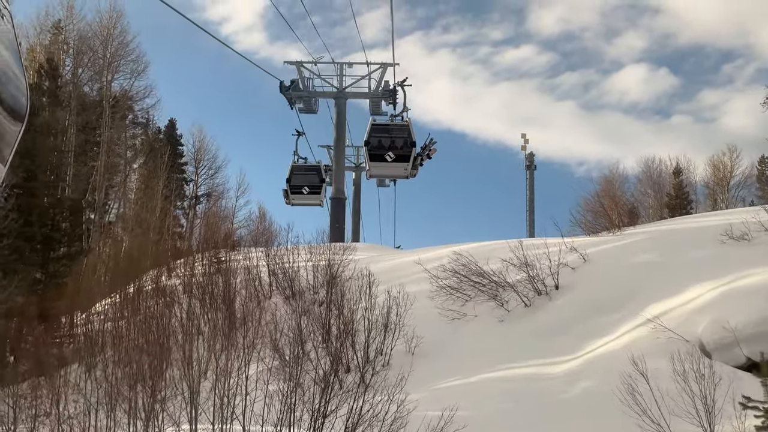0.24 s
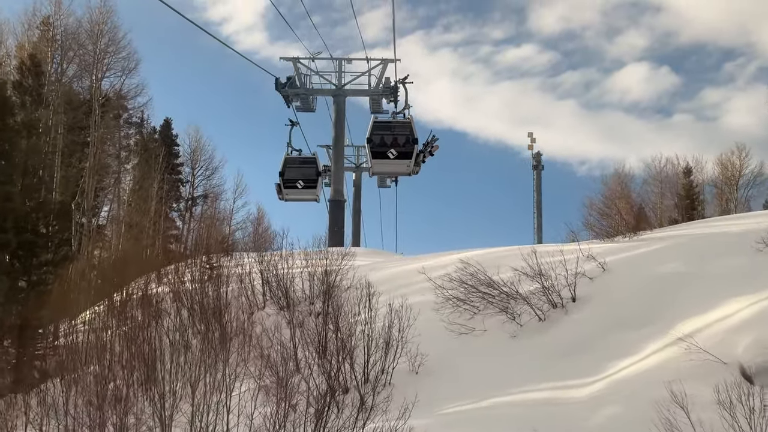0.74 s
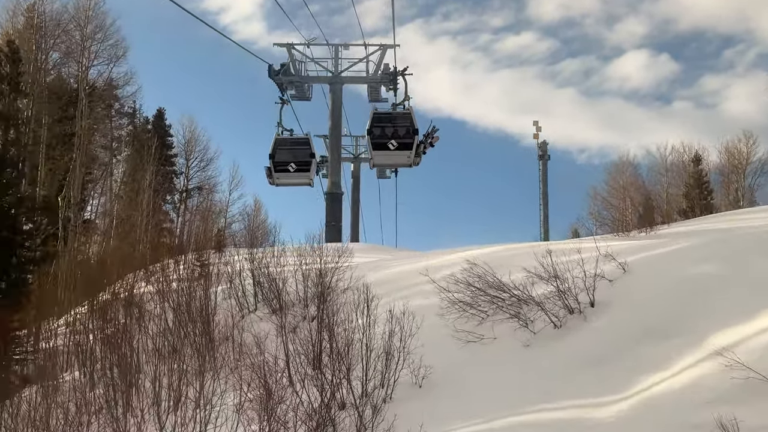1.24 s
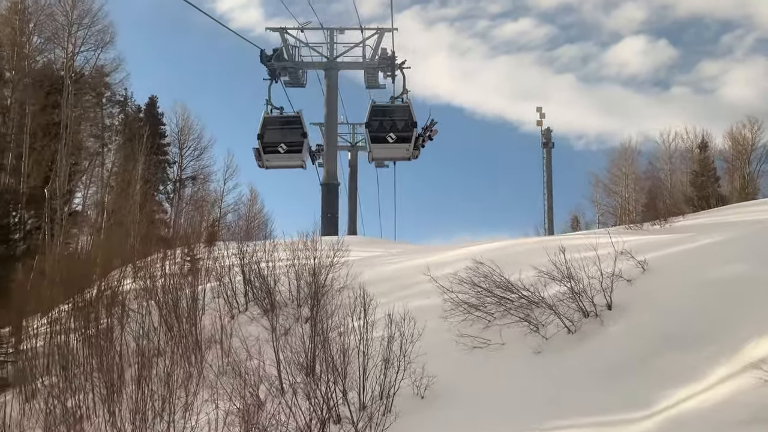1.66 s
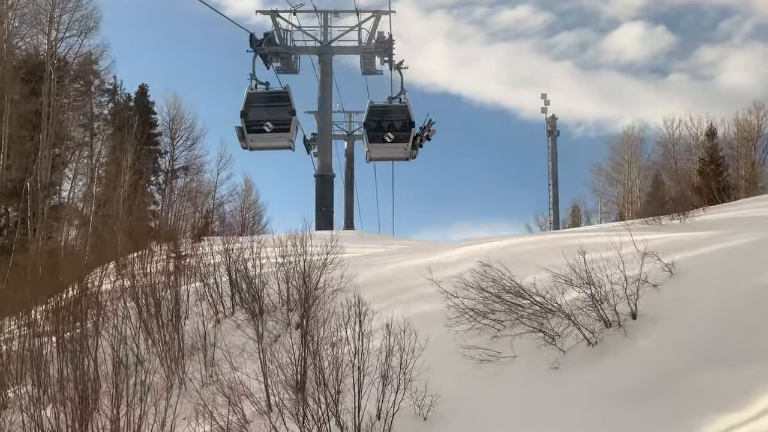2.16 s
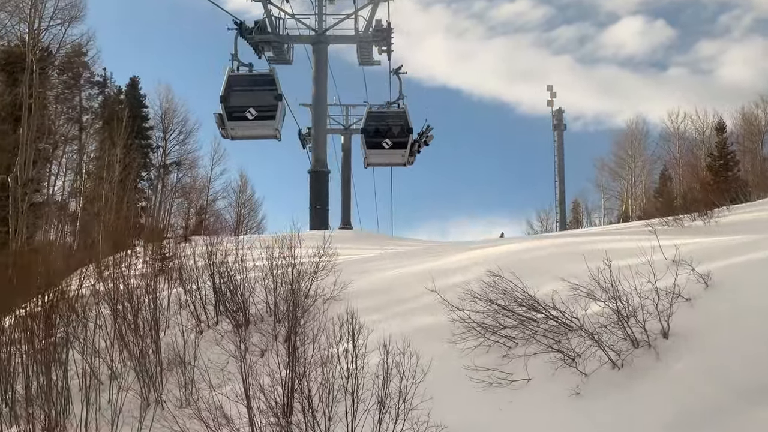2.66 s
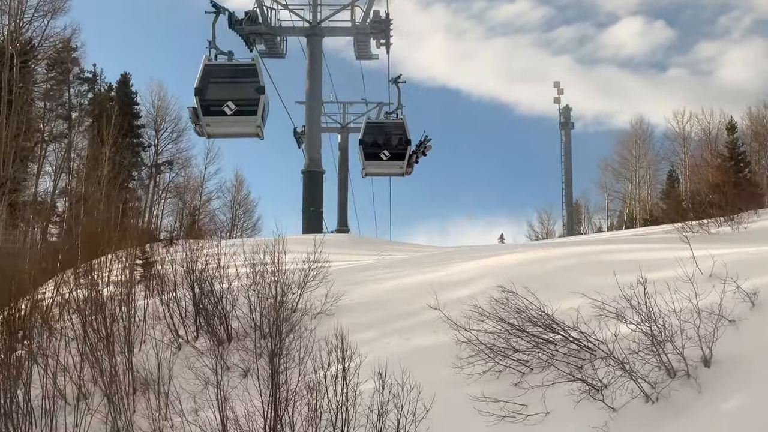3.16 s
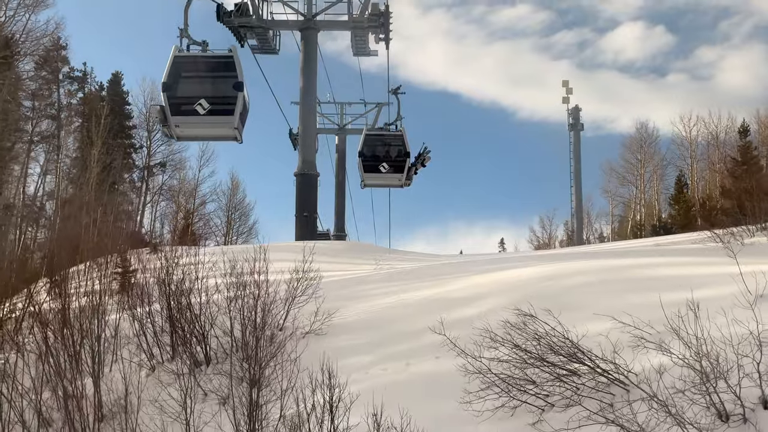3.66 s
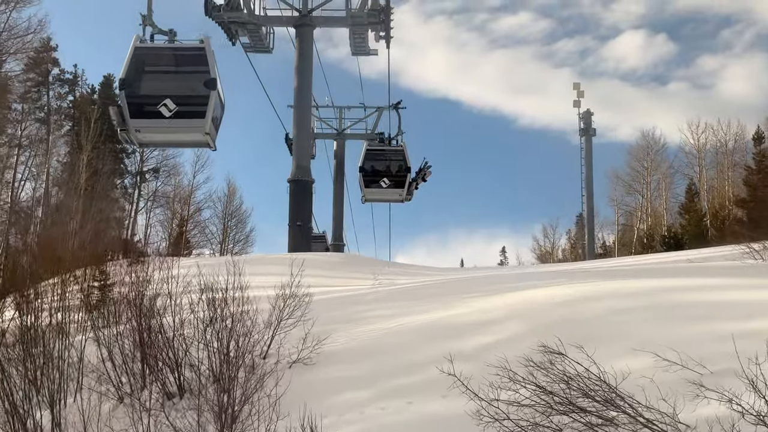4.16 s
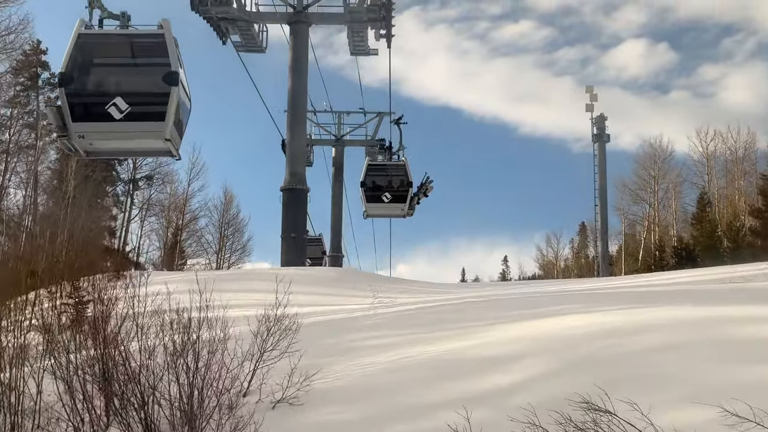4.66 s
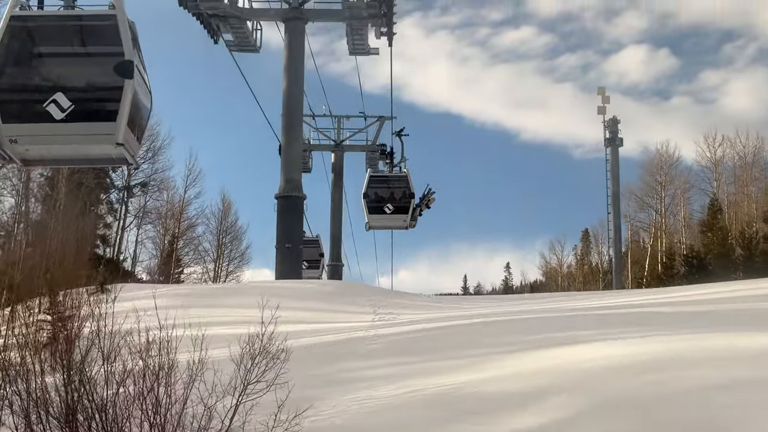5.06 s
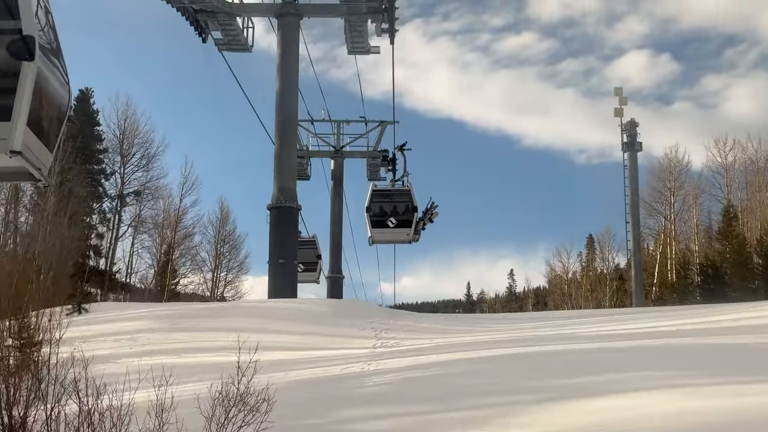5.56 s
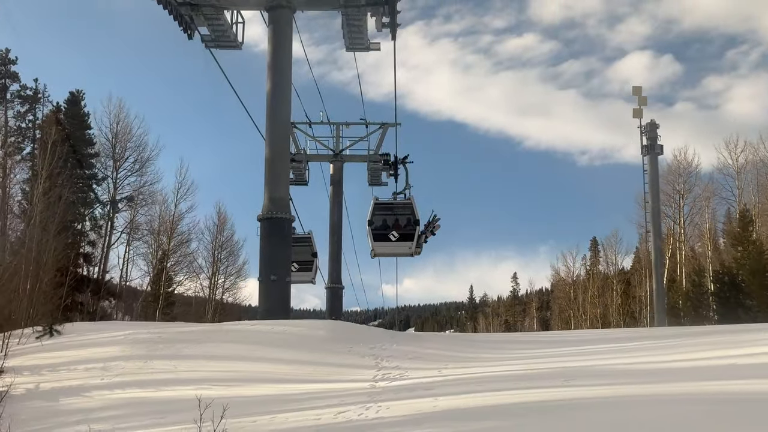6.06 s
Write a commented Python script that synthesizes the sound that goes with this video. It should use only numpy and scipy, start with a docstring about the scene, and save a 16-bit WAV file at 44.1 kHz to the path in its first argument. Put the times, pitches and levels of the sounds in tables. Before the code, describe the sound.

A small microphone rides close to skis on packed snow, with no echo. Faint edge scrapes and cracking crust crumbs punctuate a wavering low lift hum, slightly left, which grows fuller as a tower nears. Midway a burst of crunches carries a rising and falling buzz; later one ski slaps, edges groan and grind, and powder sprays briefly.

```python
"""First the hum of a gondola lift's haul rope on the sheaves, gaining overall as the tower nears.
The rope is a wavering sine with weak overtones; the tower adds a drone, beating tones and filtered rumble.
Close by, skis on packed snow hiss, scrape and crunch: random grains and noise, shaped by each edge stroke.
Crumbs crack, an edge squeaks, groomed ridges buzz once, a ski clacks once, powder sprays and air thumps.
A small two-port microphone travels with the skis over open, echoless snow."""
import sys
import numpy as np
from scipy import signal
from scipy.fft import rfft, irfft, next_fast_len
from scipy.io import wavfile
from scipy.ndimage import uniform_filter1d, map_coordinates

SR = 44100
rng = np.random.default_rng(int(sys.argv[2]) if len(sys.argv) > 2 else 0)


def log_audio(samples):
    """Write samples as a 16-bit WAV file to the path given in sys.argv[1]."""
    # one column per channel
    frames = np.atleast_2d(samples).T
    # limit to full scale, then quantise
    limited = np.clip(frames, -1, 1)
    pcm = np.round(limited * 32767).astype(np.int16)
    wavfile.write(sys.argv[1], SR, pcm)


N = 278271  # samples

# Every spectrum below is relative: the sound it colours is brought to rms 1 before its level is set.

# Rope strands drumming on the sheaves: [t/s, level before trim/dB]
ROPE_LEVEL = [(0.0, -41), (0.12, -35), (0.26, -47.5), (0.77, -39.5), (1.02, -59), (1.09, -41),
              (1.79, -32.5), (3.51, -32.5), (3.6, -27.5), (3.85, -34), (4.06, -25), (4.24, -34.5),
              (5.34, -27), (6.12, -30), (6.24, -24.5), (6.31, -27)]
# Rate at which the strands pass the sheaves: [t/s, f/Hz]
ROPE_PITCH_CURVE = [(0, 82.46), (.9, 82.37), (1.3, 85.4), (5.6, 85.27), (5.85, 84.57)]

# The mast's low drone: [t/s, level before beating/dB]
DRONE_LEVEL = [(0, -53), (1.1, -36.5), (1.7, -37.5), (3.35, -33.5), (3.75, -39), (4.2, -37), (6.31, -44)]
# Pitch of that drone: [t/s, f/Hz]
DRONE_PITCH_CURVE = [(0, 41), (1.1, 39), (3.4, 40), (3.9, 42.4)]
# The drone swells and sinks: rate/Hz, depth/dB either way, t/s of one crest
BEAT_HZ, BEAT_DB, BEAT_CREST_S = 2.39, 2.5, 1.69
# The sheave train shaking the tower: [t/s, level before trim/dB]
SHAKE_LEVEL = [(0, -47.5), (1.9, -45), (6.31, -43)]
# Narrow tones of the sheave train: [f/Hz, level relative to the shaking, before nearness and trim/dB]
SHEAVE_TONES = [(27.3, -15), (71, 4), (75.3, -2), (112, -12.5), (138, -13), (366, -21)]
# Those tones come forward as the tower nears, then ease back: [t/s, level change before trim/dB]
TONE_NEARNESS = [(0, -20), (.9, -8.5), (1.5, 3), (2.5, 2), (6.3, -6.5)]
# Tower rumble: [f/Hz, level per Hz/dB]
RUMBLE_SPECTRUM = [(14, -47), (25, -8), (35, -1), (65, 3.5), (115, -2.5), (150, -5), (200, -12.5),
                   (360, -19.5), (600, -29), (1500, -44), (4000, -76)]

# Strokes of a ski edge: [start t/s, length/s, then before trim: edge scrape/dB, base hiss/dB, crunch/dB]
EDGE_STROKES = [(0.0, 0.14, -56, -63.5, -56), (0.128, 0.16, -59.5, -67, -58), (0.43, 0.13, -66, -67, -65),
                (0.538, 0.27, -60.5, -65, -62), (0.81, 0.44, -64.5, -64.5, -68), (1.12, .07, -65, -67, -59),
                (1.211, .12, -56.5, -60, -56), (1.651, 0.084, -66.5, -67, -67),
                (1.792, 0.17, -65, -65.5, -68), (1.94, 0.17, -60.5, -62.5, -58.5),
                (2.086, 0.27, -65, -65.5, -67), (2.428, 0.094, -68, -70, -47.5),
                (2.488, 0.075, -51.5, -67, -42.5), (2.566, .12, -52.5, -60, -54),
                (2.655, 0.093, -51.5, -58.5, -43.5), (2.981, 0.13, -65, -62.5, -58),
                (3.32, .2, -68.5, -65, -59.5), (3.497, 0.14, -60, -61.5, -64),
                (3.639, 0.373, -57.5, -60.5, -52), (3.999, 0.082, -61.5, -53.5, -54.5),
                (4.085, 0.21, -59.5, -60, -56), (4.227, 0.19, -57.5, -57.5, -55.5),
                (4.427, 0.24, -62, -60, -58), (4.699, .14, -65.5, -67.5, -55.5),
                (5.057, 0.029, -57.5, -58.5, -55), (5.331, 0.11, -52, -57.5, -46),
                (5.412, 0.17, -50.5, -55.5, -49), (5.568, 0.21, -54.5, -57.5, -53.5),
                (5.789, .16, -60.5, -62, -59), (5.944, 0.17, -50, -54, -49),
                (6.261, .06, -53.5, -57.5, -50)]
# The edge digs in, lets go, and eases while it holds
ATTACK_S, RELEASE_S, SAG_DB_PER_S = 0.045, 0.049, 2
# Hiss of the skis running flat under the strokes: [t/s, level before trim/dB]
GLIDE_LEVEL = [(0, -73), (1.6, -69), (3.3, -66.5), (4.9, -70), (5.25, -65.5), (6.31, -64.5)]
GLIDE_SCRAPE_DB, GLIDE_CRUNCH_DB = 0.5, 1.5  # relative to the glide hiss, before trim
# Bases on fine crystals: [f/Hz, level per Hz/dB]
HISS_SPECTRUM = [(900, -21), (2500, -1), (3600, -4), (4600, -5), (5100, 0), (7000, 0.5), (8000, -0.5),
                 (9000, 2), (10000, -2), (11200, -10), (13000, -12), (14000, -7.5), (15800, -9)]
# Edges on coarser grains: [f/Hz, level per Hz/dB]
SCRAPE_SPECTRUM = [(400, -5.5), (900, -1.5), (1300, 4), (1600, 0), (2200, 0), (3000, -9.5), (4300, -12.5),
                   (6000, -17), (12000, -36)]
# Snow packing under the edges: [f/Hz, level per Hz/dB]
CRUNCH_SPECTRUM = [(130, -30), (300, 1.5), (500, 3), (850, 1), (1200, -9), (1600, -16.5), (3000, -35)]
# An edge ploughs deep and groans: [start t/s, length/s, level/dB]
DEEP_PLOUGHS = [(1.275, 0.073, -47), (5.301, .13, -37.5), (5.472, .32, -44), (5.984, 0.097, -44)]
# Colour of that groan: [f/Hz, level per Hz/dB]
PLOUGH_SPECTRUM = [(100, -12), (190, 7), (260, 1), (360, 4), (480, -11), (800, -36)]

# Largest crumbs of crust cracking under the skis: [t/s, level/dB, treble relative to it/dB]
LARGE_CRUMBS = [(0.569, -41, -20), (0.601, -43, -21), (0.786, -35.5, -27), (2.76, -33.5, -27),
                (2.813, -37.5, -21), (3.013, -44, -21), (3.675, -42.5, -5), (3.345, -53, -1),
                (3.967, -38, -16), (4.195, -39, -22), (4.637, -42, -13), (4.817, -46, -6), (5.093, -47, -3),
                (5.285, -44, -21), (5.832, -37.5, -24), (5.971, -34, -21), (6.047, -34, -17),
                (6.137, -36, -21)]
# Body of a crack: [f/Hz, level per Hz/dB]
CRACK_SPECTRUM = [(200, 2), (600, 11.5), (1100, 4.5), (2400, -1), (3300, -16.5), (8000, -31)]
# Small crumbs: rate, mean level over the scrape gain, scatter, treble relative to the crumb
SMALL_CRUMBS_PER_S, SMALL_CRUMB_DB, SMALL_SPREAD_DB, SMALL_TREBLE_DB = 20, 4, 2, -14

# A ski crossing groomed ridges: [t/s, ridge rate f/Hz]
RIDGE_RATE = [(2.49, 330), (2.538, 440), (2.562, 412), (2.592, 550), (2.615, 672), (2.633, 700),
              (2.657, 655), (2.675, 560), (2.715, 470)]
# The octave swells first, then the fundamental: [multiple of rate, middle t/s, half length/s, level/dB]
RIDGE_BUZZ = [(1, 2.655, .052, -37.5), (2, 2.608, .066, -36.5)]
RASP_DB = -49  # grains shed at each ridge

# One clack, a ski slapping down and rebounding: [t/s, level/dB]
SKI_SLAPS = [(5.0058, -25), (5.0162, -32), (5.028, -38)]
# Bending modes of the ski: [f/Hz, mean level relative to the slap/dB, t60/s]
BENDING_MODES = [(366, -4, 0.077), (436, -16, 0.16), (573, -19, .08), (830.4, -11.5, 0.08),
                 (1010, -24, .04)]

# Thin squeaks of cold snow under an edge: [middle t/s, f/Hz, half length/s, level/dB]
EDGE_SQUEAKS = [(1.679, 10750, .05, -72), (3.58, 4990, 0.079, -63), (3.701, 7680, .045, -56.5),
                (3.714, 14200, .06, -60), (4.381, 2390, 0.014, -53)]
# Powder thrown off the tail of a ski: [f/Hz, level per Hz/dB]
POWDER_SPECTRUM = [(1000, -27), (2200, 1), (4200, -1.5), (6000, -1.5), (8000, -22), (15000, -28)]
# Air pushing on the microphone: [f/Hz, level per Hz/dB]
BUFFET_SPECTRUM = [(18, -35), (32, 0.5), (52, 0), (75, -17), (130, -45), (400, -90)]

# Likeness of the two microphone ports: [f/Hz, correlation before the port phases]
PORT_LIKENESS = [(45, 1), (150, .9), (300, .65), (1200, .68), (2000, 1), (2300, 1), (2900, .93),
                 (4800, .95), (5500, 1), (8600, 1), (10000, .9), (11200, 1), (13000, 1), (14000, .8)]
# Phase by which the left channel leads the right: [f/Hz, lead/rad]
CHANNEL_LEAD = [(40, 0), (90, .45), (200, .05), (350, 0), (520, 1.5), (720, 1.6), (1400, -.15), (2200, 0),
                (2800, .42), (4600, .35), (5300, 0), (6700, .1), (7400, 1.3), (8000, 3.1), (8550, 3.1),
                (9300, 1.3), (10200, .9), (11000, 0), (13000, 0), (15700, -2.2)]
TOP_HZ = 15780  # the microphone's band limit


def rope():
    """The twisted strands drum on the sheaves: a nearly pure hum with weak, wavering overtones."""
    hz, = curves(ROPE_PITCH_CURVE)
    level_db, = curves(ROPE_LEVEL)
    phase = turns(hz + 0.392 * wobble(9))
    second_gain = amp(-24 + 5.6 * wobble(6.9))
    second = second_gain * np.sin(2 * phase + 0.41 * wobble(10))
    third_gain = amp(-31.0 + 4.56 * wobble(7))
    third = third_gain * np.sin(3 * phase + wobble(12))
    hum = np.sin(phase) + second + third
    return panned(amp(level_db + 2.5) * hum, left_db=4.5)


def tower():
    """The mast drones about an octave under the rope; the shaken sheave train adds beating tones and rumble."""
    hz, = curves(DRONE_PITCH_CURVE)
    drone_db, = curves(DRONE_LEVEL)
    shake_db, = curves(SHAKE_LEVEL)
    nearness_db, = curves(TONE_NEARNESS)
    beat_db = BEAT_DB * np.cos(2 * np.pi * BEAT_HZ * (np.arange(N) / SR - BEAT_CREST_S))
    drone = amp(drone_db + beat_db) * np.sin(turns(hz + 0.96 * wobble(7.42)))
    tones = 0
    for tone_hz, db in SHEAVE_TONES:
        tone_gain = amp(db + 3.6 * wobble(4.19))
        tones = tones + tone_gain * np.sin(turns(tone_hz + 1.068 * wobble(4.99)))
    rumble = amp(6.0) * coloured(noise(), RUMBLE_SPECTRUM)
    train = panned(amp(1.5 + nearness_db) * tones + rumble, left_db=0.5)
    return drone + amp(shake_db) * train


def skis(scrape_gain, hiss_gain, crunch_gain):
    """The bases hiss on fine crystals; the edges break coarser grains, in clumps, and pack the snow below."""
    clumps, unevenness = wobble(90), wobble(18)
    crystals = coloured(grains(rate=5300, spread_db=2.5, smooth=1.75), HISS_SPECTRUM)
    chips = speckled(grains(rate=900, spread_db=3.0, smooth=1.0), depth_db=2.5)
    lumps = speckled(grains(rate=250, spread_db=3, smooth=1.0), depth_db=2.0)
    hiss = hiss_gain * amp(5.5 + 0.5 * clumps + 0.44 * unevenness) * crystals
    scrape = scrape_gain * amp(2.5 + 0.99 * clumps + 0.54 * unevenness) * coloured(chips, SCRAPE_SPECTRUM)
    crunch = crunch_gain * amp(3.0 + 0.43 * clumps + 2.3 * unevenness) * coloured(lumps, CRUNCH_SPECTRUM)
    plough_gain = sum(amp(db) * bite(start, length) for start, length, db in DEEP_PLOUGHS)
    groan = coloured(grains(rate=240, spread_db=3.5, smooth=0.35), PLOUGH_SPECTRUM)
    return hiss + scrape + crunch + plough_gain * groan


def friction():
    """Gains of scrape, hiss and crunch: the strokes add in power to the flat glide."""
    glide_db, = curves(GLIDE_LEVEL)
    offsets_db = np.array([[GLIDE_SCRAPE_DB], [0], [GLIDE_CRUNCH_DB]])
    power = amp(glide_db + offsets_db) ** 2
    for start, length, *levels_db in EDGE_STROKES:
        power = power + np.outer(amp(levels_db), bite(start, length)) ** 2
    return np.sqrt(power)


def bite(start, length):
    """Gain of one stroke of an edge: it digs in, eases while it holds, and lets go."""
    t = np.maximum(np.arange(N) / SR - start, 0)
    attack = np.minimum(t / ATTACK_S, 1)
    release = np.exp(-np.maximum(t - length, 0) / RELEASE_S)
    return attack * amp(-SAG_DB_PER_S * t) * release


def ridges():
    """Groomed ridges strike the ski at a rate that rises and falls as it turns across them, unevenly."""
    hz, = curves(RIDGE_RATE)
    phase = turns(hz * (1 + 0.024 * wobble(250)))
    buzz = 0
    for multiple, middle, length, db in RIDGE_BUZZ:
        uneven = unit(amp(3.5 * wobble(110)) * np.sin(multiple * phase))
        buzz = buzz + amp(db) * swell(middle, length) * uneven
    bursts = swell(s=2.623, length=0.11) * (1 + np.sin(phase))  # each ridge sheds grains
    rasp = amp(RASP_DB) * bursts * coloured(noise(), SCRAPE_SPECTRUM)
    return panned(buzz + rasp, left_db=2.0)


def slap(high_hz=1150, low_hz=300, sweep_s=0.00463, t60=0.063, puff_t60=0.12):
    """High bending waves run ahead of low ones: a falling chirp, a ring damped by snow, a puff of powder."""
    ring, puff = np.zeros((2, N + SR))
    t = np.arange(SR // 4) / SR
    falling_hz = low_hz + (high_hz - low_hz) * np.exp(-t / sweep_s)
    chirp = amp(-60 * t / t60) * np.sin(2 * np.pi * np.cumsum(falling_hz) / SR)
    onset = 1 - np.exp(-t / 0.002)
    for s, db in SKI_SLAPS:
        first = round(s * SR)
        modes = 0
        for hz, mode_db, life in BENDING_MODES:
            decay = amp(mode_db + rng.normal(0, 4.0) - 60 * t / life)
            modes = modes + decay * np.sin(2 * np.pi * hz * t)
        ring[first:][:len(t)] += amp(db) * onset * (chirp + modes)
        puff[first:][:len(t)] += amp(db - 25.5 - 60 * t / puff_t60)
    return panned(ring[:N], left_db=1.5) + puff[:N] * coloured(noise(), HISS_SPECTRUM)


def crumbs(scrape_gain):
    """Each crumb of crust snaps, then crumbles with a spray of fine crystals; small ones follow the scrape."""
    body, spray = np.zeros((2, N + SR))
    t = np.arange(SR // 10) / SR
    snap = amp(1 - 60 * t / 0.013)
    crumble = amp(-12 - 60 * t / 0.07)
    shape = snap + crumble
    breaks = np.flatnonzero(rng.random(N) < SMALL_CRUMBS_PER_S / SR)
    scrape_db = 20 * np.log10(scrape_gain)
    size_db = scrape_db + SMALL_CRUMB_DB + SMALL_SPREAD_DB * rng.standard_normal(N)
    small = [(i / SR, size_db[i], SMALL_TREBLE_DB) for i in breaks]
    for s, db, treble_db in list(LARGE_CRUMBS) + small:
        first = round(s * SR)
        body[first:][:len(t)] += amp(db) * shape
        spray[first:][:len(t)] += amp(db + treble_db) * shape
    crack = body[:N] * coloured(noise(), CRACK_SPECTRUM)
    return crack + amp(1) * spray[:N] * coloured(noise(), HISS_SPECTRUM)


def squeaks():
    """Stick and slip at the edge: a rough, narrow whistle that swells and fades."""
    total = 0
    for middle, hz, length, db in EDGE_SQUEAKS:
        whistle = unit(np.sin(turns(hz + 130 * wobble(600))))
        total = total + amp(db) * swell(middle, length) * whistle
    return total


def powder():
    """Powder thrown off the tail of a ski near the end: one short, bright spray of grains."""
    flakes = coloured(grains(rate=2100, spread_db=4, smooth=1), POWDER_SPECTRUM)
    return amp(-44.5) * swell(s=6.12, length=0.033) * flakes


def buffet():
    """One soft puff of air thumps both microphone ports: a swell of low noise."""
    return amp(-28.5) * swell(s=1.11, length=0.065) * coloured(noise(), BUFFET_SPECTRUM)


def amp(db):
    """Decibels to gain."""
    return 10 ** (np.asarray(db) / 20)


def unit(x):
    """Scale to rms 1."""
    return x / np.sqrt(np.mean(x ** 2) + 1e-20)


def along(points, hz):
    """A table of f/Hz and value, read on a log frequency axis."""
    f, value = np.transpose(points)
    return np.interp(np.log(hz + 1), np.log(f), value)


def curves(rows):
    """One value per sample for each column after the time."""
    s, *columns = np.transpose(rows)
    return [np.interp(np.arange(N) / SR, s, column) for column in columns]


def wobble(rate):
    """A smooth random curve, rate knots a second."""
    knots = rng.standard_normal(int(N * rate / SR) + 4)
    return map_coordinates(knots, [np.arange(N) * rate / SR])


def turns(hz):
    """Running phase of a moving frequency, from a random start."""
    return 2 * np.pi * (np.cumsum(hz) / SR + rng.random())


def swell(s, length):
    """A bell-shaped rise and fall around time s."""
    return np.exp(-((np.arange(N) / SR - s) / length) ** 2)


def noise():
    """Two unrelated channels of white noise."""
    return rng.standard_normal((2, N))


def grains(rate, spread_db, smooth):
    """Tiny fractures of uneven size, rate a second, over a share of smooth friction noise."""
    size = amp(spread_db * np.clip(rng.standard_normal(N), -2, 2))
    breaks = (rng.random(N) < rate / SR) * size * noise()
    return unit(breaks) + smooth * noise()


def speckled(pair, depth_db):
    """As the contact shifts, narrow bands of the friction ring up and fade."""
    bands = signal.stft(pair, nperseg=512)[2]
    field = rng.standard_normal(bands.shape[1:])
    field = uniform_filter1d(field, size=2, axis=0)  # across frequency
    field = uniform_filter1d(field, size=12, axis=1)  # along time
    return signal.istft(bands * amp(depth_db * unit(field)), nperseg=512)[1][:, :N]


def filtered(x, response):
    """Filter x by a response of frequency, with room for the tail."""
    m = next_fast_len(N + SR // 2)
    return irfft(rfft(x, m) * response(np.fft.rfftfreq(m, 1 / SR)), m)[..., :N]


def coloured(pair, spectrum):
    """Two unrelated signals become a partly alike left and right with this spectrum, rms 1."""
    def mid_side(hz):
        angle = np.arccos(np.clip(along(PORT_LIKENESS, hz), -1, 1)) / 2
        return amp(along(spectrum, hz)) * [np.cos(angle), np.sin(angle)]
    mid, side = filtered(pair, mid_side)
    return unit(np.array([mid + side, mid - side]))


def panned(x, left_db):
    """Tilt the balance towards the left."""
    return x * amp([[left_db / 2], [-left_db / 2]])


def scene():
    """Open snow gives no echo: the lift, the skis and the air simply add."""
    lift = rope() + tower()
    scrape_gain, hiss_gain, crunch_gain = friction()
    snow = skis(scrape_gain, hiss_gain, crunch_gain) + ridges() + slap()
    snow = snow + crumbs(scrape_gain) + squeaks() + powder()
    return lift + snow + buffet()


def record(dry):
    """The two ports differ in phase, opposed near 8 kHz; nothing is kept above the band limit."""
    def ports(hz):
        half_lead = along(CHANNEL_LEAD, hz) * np.array([[0.5], [-0.5]])
        return np.exp(1j * half_lead) * (hz < TOP_HZ)
    return filtered(dry, ports)


dry = scene()
out = record(dry)
log_audio(out)
```